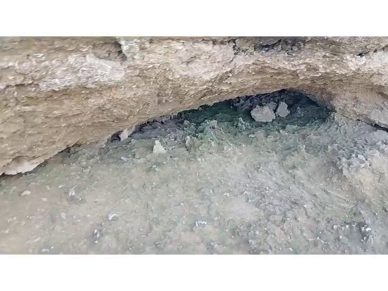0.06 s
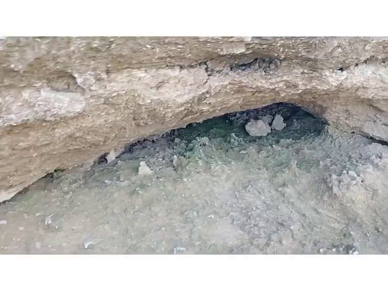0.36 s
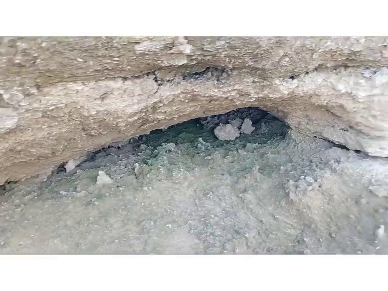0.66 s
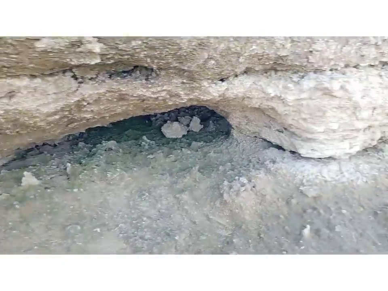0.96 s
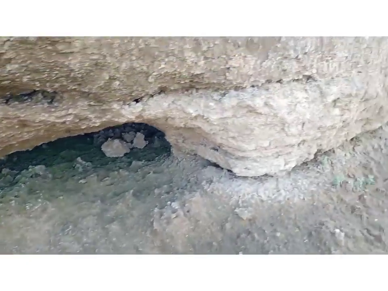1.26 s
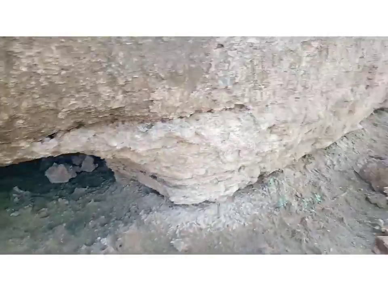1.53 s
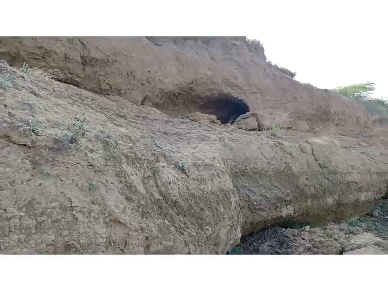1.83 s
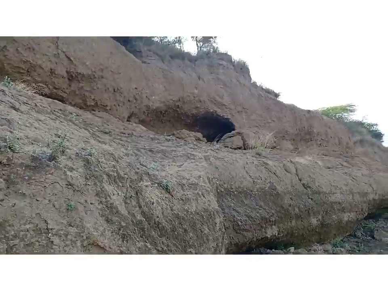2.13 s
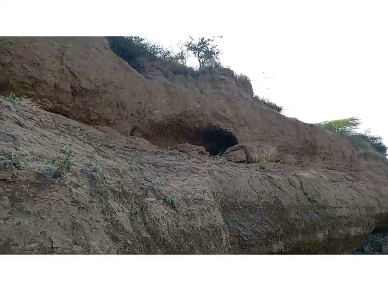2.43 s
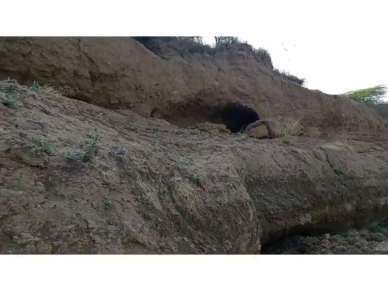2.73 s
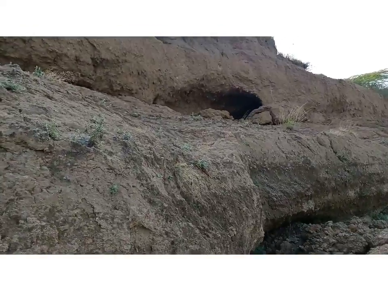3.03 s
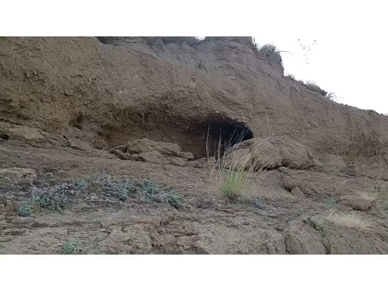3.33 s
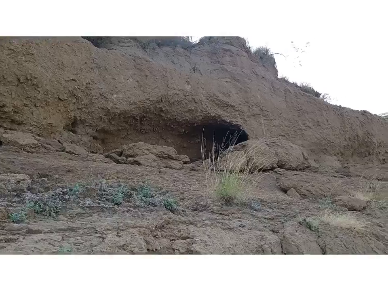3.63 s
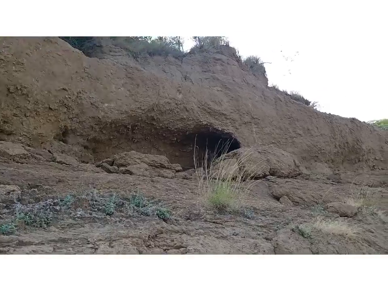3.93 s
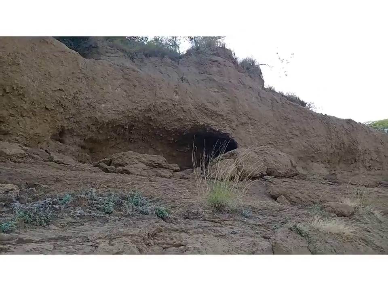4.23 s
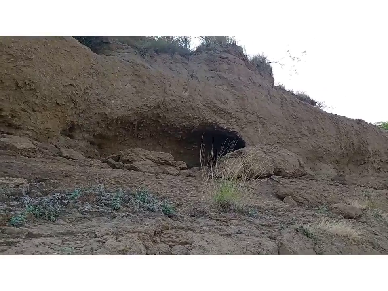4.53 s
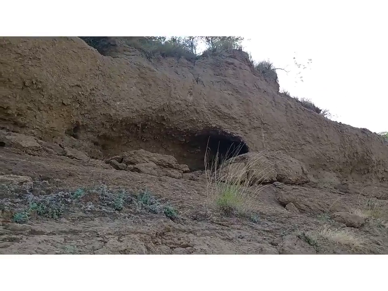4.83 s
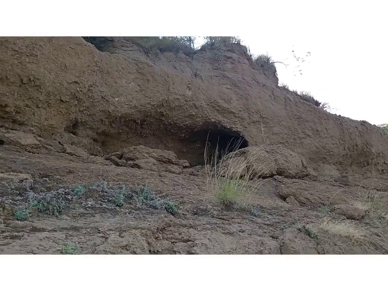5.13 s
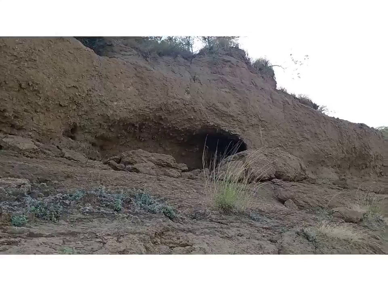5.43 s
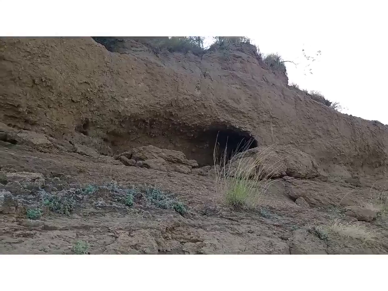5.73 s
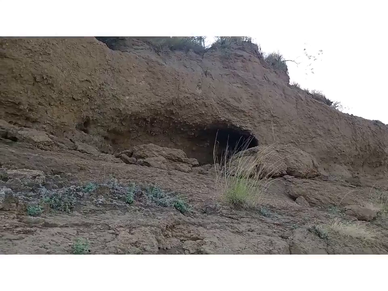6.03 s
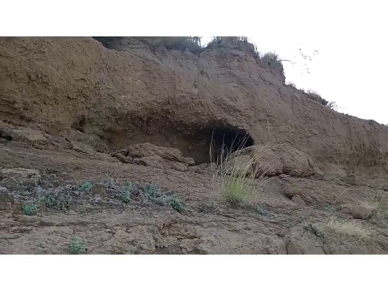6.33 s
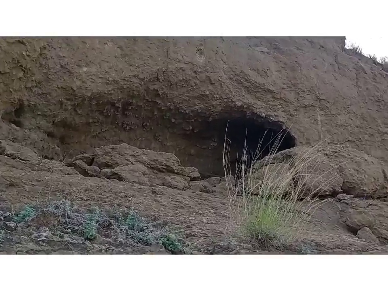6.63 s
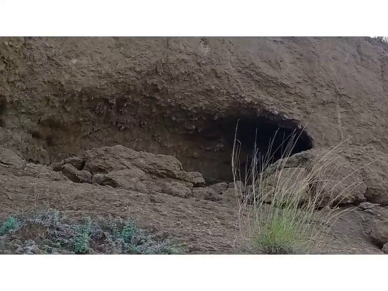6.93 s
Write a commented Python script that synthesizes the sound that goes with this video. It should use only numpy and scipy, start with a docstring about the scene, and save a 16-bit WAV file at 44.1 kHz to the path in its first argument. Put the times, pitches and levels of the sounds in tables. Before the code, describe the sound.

Outdoors, faint wind and far water hiss steadily behind close footwork. For the first 1.5 seconds, soles drag, rasp and crunch on dry, crumbly earth, building to a knock and low thump at about 1.4 seconds. The background changes tone at 1.6 seconds, and a faint, hollow drone wavers in the distance until about 3 seconds. Loose stones and a hand on the microphone make scattered damped knocks and taps, the clearest near 2.7 seconds. The sound drops out for an instant at 3.3 seconds and returns with a short crunch and a slightly quieter background. From 3.9 to 5.4 seconds come handling rumble, dull thumps, knocks and gritty steps with small cracking crumbs. A sharp, loud knock and a crunch land near 5.8 seconds, then a soft hollow bump. Dry grass rustles very faintly from about 6.2 seconds to the end at 7.

```python
"""Soles crunch, drag and rasp on dry, crumbly earth as someone shifts footing below a clay bank,
then stands in the open. Grit fractures under load and the soles stick and slip; loose stones and
the hand on the microphone's case give damped knocks, taps and thumps. Faint wind and far water
hiss behind, coloured differently at three standpoints, with a distant drone and a late rustle
of grass. The sound breaks off for an instant before the last standpoint."""
import sys
import numpy as np
from scipy import signal
from scipy.fft import rfft, irfft, next_fast_len
from scipy.io import wavfile
from scipy.ndimage import uniform_filter1d

SR = 44100
rng = np.random.default_rng(int(sys.argv[2]) if len(sys.argv) > 2 else 0)


def wav_out(sig):
    """Save sig, one row per channel (or a flat mono array), as 16-bit PCM at SR to the path in sys.argv[1]."""
    wavfile.write(sys.argv[1], SR, np.round(np.clip(np.atleast_2d(sig).T, -1, 1) * 32767).astype(np.int16))


N = 311787
TIME = np.arange(N) / SR
SLOPE_S, BREAK_S, OPEN_S = 1.62, 3.27, 3.334  # second standpoint, dropout, third standpoint
SNAP_HZ, SNAP_WIDTH_HZ = 5970, 1400  # bright mode of a hard contact
TICK_HZ, TICK_WIDTH_HZ = 10120, 1800  # resonance of the microphone port

# Sharp impacts: start_s, level_db, pitch_ratio, hardness_db_per_octave,
# place_db (+ favours the odd modes), case_ring_db, hollow_hz, treble_edge_hz, snap_db
KNOCKS = [(0.0519, -35.5, 0.82, 5.5, 2, -54, 500, 6400, -65),
          (1.4077, -13.5, 1.12, 0.5, -1.5, -40.0, 1190, 3670, -47.0),
          (1.412, -20, 0.66, 1.6, -5, -40.0, 1380, 6200, -25.5),
          (1.54, -18, 0.74, -0.8, -4.5, -33, 473, 6000, -65.0),
          (1.5623, -41.5, 0.75, 0.6, -20, -28.5, 600.0, 6200.0, -36),
          (1.6166, -30.5, 1.25, 2.5, 6, -49, 3060, 6170, -33),
          (2.1708, -34.5, 1.82, 8, 9, -54, 2460, 7500.0, -28.5),
          (2.175, -32.5, 1.22, 0.8, 3.5, -54.0, 470.0, 6200.0, -39),
          (2.644, -43.5, 1.03, -2.5, 22.5, -32, 1300, 7540, -44),
          (2.6923, -12, 0.74, -2.5, 0, -53, 1390, 7540, -38.5),
          (3.1615, -20, 0.85, 5.5, 9, -30, 910, 6160, -35.5),
          (3.3538, -30.5, 1.32, 7, 7.5, -48, 2790.0, 6200.0, -28.5),
          (4.029, -15, 0.93, 1.9, 0.3, -28, 1000, 5200.0, -30.5),
          (4.0632, -34.5, 0.62, 5, -2, -26.5, 1340.0, 6200.0, -31),
          (4.22, -38, 1.3, 2, 10.5, -21, 1220, 6040, -75),
          (4.387, -33, 0.86, 2, -21.5, -44, 445, 5900, -31),
          (4.3906, -25, 0.9, 3.5, -3.5, -29, 980.0, 7500.0, -26.5),
          (4.4545, -29, 0.59, 3, -2, -53, 1920.0, 5200.0, -40),
          (4.5476, -45.5, 1.3, -0.6, -21, -35, 690, 5900, -37.5),
          (4.8421, -14.5, 0.42, -3.5, -6.5, -33, 3320, 6050, -40),
          (5.1595, -43, 0.86, 0.9, 22, -34, 930, 7540, -63.0),
          (5.3414, -31.5, 0.75, 0.2, 16, -24.5, 1350, 7500.0, -59),
          (5.7534, -8, 1.25, 4, 3, -27, 2540, 4250, -29.5),
          (6.1503, -35.5, 0.66, -6.5, -12.5, -23.5, 576, 6000, -63)]
# Spectrum of hard sand: frequency_hz, level_db
SAND = [(2200, -2), (4000, 4.5), (5700, 3), (7000, -24), (8500, -27.5), (10800, -19), (16000, -37)]


def from_db(db):
    """Amplitude ratio of a level in decibels."""
    return 10 ** (np.asarray(db) / 20)


def rms_one(x):
    """Normalisation to rms 1."""
    return x / np.sqrt(np.mean(x ** 2) + 1e-20)


def add(out, start_s, sound):
    """Superposition of a short sound on out."""
    i = max(round(start_s * SR), 0)
    out[i:i + len(sound)] += sound[:N - i]


def level_curve(rows):
    """Envelope interpolated through (time_s, level_db) rows; silent after the last."""
    times, db = np.transpose(rows)
    return from_db(np.interp(TIME, times, db)) * (TIME <= times[-1])


def gestures(rows, attack_s, release_s):
    """Envelope of (start_s, length_s, level_db) movements; incoherent sources add in power."""
    power = 0
    for start_s, length_s, db in rows:
        rise = np.clip((TIME - start_s) / attack_s + .5, 0, 1)
        decay = np.exp(-np.maximum(TIME - start_s - length_s, 0) / release_s)
        power = power + (from_db(db) * rise * decay) ** 2
    return np.sqrt(power)


def press(centre_s, half_s):
    """Gaussian swell of pressure under a sole."""
    return np.exp(-np.minimum(((TIME - centre_s) / half_s) ** 2, 60))


def drift(rate_hz):
    """Random modulation, interpolated between rate_hz values a second; rms 1."""
    knots = rng.standard_normal(4096)
    return rms_one(np.interp(TIME * rate_hz, np.arange(len(knots)), knots))


def grains(per_s, spread_db, clump_db):
    """Shot noise of fracture: impulses at random times, their sizes swelling in clumps."""
    sizes = from_db(spread_db * np.minimum(rng.exponential(1, N), 4)) * rng.choice([-1, 1], N)
    return sizes * (rng.random(N) < per_s / SR) * from_db(clump_db * drift(rate_hz=290))


def cut(x, hz, kind, order=2):
    """Butterworth low- or high-pass."""
    return signal.sosfilt(signal.butter(order, min(hz, .45 * SR), kind, fs=SR, output="sos"), x)


def coloured(x, spectrum):
    """Spectral shaping by (frequency_hz, level_db) points; rms 1."""
    hz, db = np.transpose(spectrum)
    size = next_fast_len(N)
    bins_hz = np.maximum(np.fft.rfftfreq(size, 1 / SR), 1)
    gain = from_db(np.interp(np.log(bins_hz), np.log(hz), db)) * np.minimum(bins_hz / hz[0], 1) ** 2
    return rms_one(irfft(rfft(x, size) * gain, size)[:N])


def bell(x, hz, width_hz, db):
    """Peaking filter: lifts or lowers one band."""
    return x + (from_db(db) - 1) * signal.lfilter(*signal.iirpeak(hz, hz / width_hz, fs=SR), x)


def resonant(x, hz, width_hz):
    """Forced response of two equal resonators in series; rms 1."""
    resonator = signal.iirpeak(hz, hz / width_hz, fs=SR)
    return rms_one(signal.lfilter(*resonator, signal.lfilter(*resonator, x + 1e-18)))


def struck(hz, width_hz, cutoff_ratio=1.98, size=1024):
    """Impulse response of a damped mode, low-passed by the finite contact time; peak 1."""
    radius = np.exp(-np.pi * width_hz / SR)
    feedback = [1, -2 * radius * np.cos(2 * np.pi * hz / SR), radius * radius]
    ring = signal.lfilter([1, 0, -1], feedback, signal.unit_impulse(size))
    ring = cut(ring, cutoff_ratio * hz, "low")
    return ring / np.abs(ring).max()


def swing(hz, t60_s, rise_cycles=0.1, size=12000):
    """Damped oscillation after a soft push: a rounded onset, then exponential decay."""
    t = np.arange(size) / SR
    rise = 1 - np.exp(-t * hz / rise_cycles)
    return -from_db(-60 * t / t60_s) * rise * np.sin(2 * np.pi * hz * t)


def air():
    """Far wind and water make broadband noise, with its own spectrum at each standpoint."""
    # Background spectra: frequency_hz, level_db
    bank_spectrum = [(35, -20), (90, 3), (165, 2), (320, -14), (760, -12), (2300, -12.5), (3100, -21.5),
                     (5000, -42), (8000, -56.5), (11000, -52), (16000, -72)]
    slope_spectrum = [(35, -21), (90, 5), (170, -1.5), (350, -5), (780, -7.5), (1150, -13.5), (2250, -10),
                      (3100, -20), (4300, -35.5), (7600, -54.5)]
    open_spectrum = [(35, -18), (70, -3.5), (140, -1.5), (210, -8.5), (350, -4.5), (640, -10), (1050, -18),
                     (1500, -22.5), (2150, -15), (3700, -33), (6400, -58.5)]
    places = [(bank_spectrum, -47, TIME < SLOPE_S),
              (slope_spectrum, -45.5, (TIME >= SLOPE_S) & (TIME < OPEN_S)),
              (open_spectrum, -48.5, TIME >= OPEN_S)]
    return sum(from_db(db) * here * coloured(rng.standard_normal(N), spectrum)
               for spectrum, db, here in places)


def drone():
    """Narrow-band noise is heard as a hollow, wavering tone in the distance."""
    # Swell of the drone: time_s, level_db
    swell = [(0, -108), (1.5, -55), (2.85, -49.5), (3.1, -73)]
    return level_curve(swell) * resonant(rng.standard_normal(N), hz=390, width_hz=36)


def grass():
    """A gust rustles dry grass: countless small contacts merge into a band of noise."""
    # Rise of the gust: time_s, level_db
    gust = [(6.2, -91), (7.1, -69)]
    return level_curve(gust) * resonant(rng.standard_normal(N), hz=3500, width_hz=1200)


def rumble(breeze_db=-49):
    """Low-frequency noise: a breeze at the bank and the shifting grip shake the microphone."""
    # Shifts of the grip: start_s, length_s, level_db
    grips = [(1.523, 0.075, -38.5), (3.867, 0.19, -46.5), (3.949, 0.26, -38), (4.417, 0.11, -46.5),
             (4.829, 0.084, -48), (5.334, 0.2, -49), (6.137, 0.074, -42.5)]
    # Spectrum of the shaking: frequency_hz, level_db
    spectrum = [(35, -29.5), (55, -7), (80, 2), (140, -2.5), (250, -10), (500, -16), (1000, -72.5)]
    shake = gestures([(0, SLOPE_S, breeze_db), *grips], attack_s=0.02, release_s=0.033)
    return shake * coloured(rng.standard_normal(N), spectrum)


def thumps(push_db=3, case_hz=79.5, case_t60_s=0.066):
    """Free vibration follows each push of weight or grip; the case rings low after each knock."""
    # Dull pushes and hollow rings: start_s, pitch_hz, level_db, t60_s
    pushes = [(0.013, 101, -28, 0.16), (0.6, 90, -22, 0.081), (1.407, 85, -11, 0.094),
              (3.923, 116, -15.5, 0.014), (3.959, 103, -10, 0.017), (4.099, 98, -12, 0.016),
              (4.205, 107, -23.5, 0.069), (4.219, 415, -31, 0.066), (4.388, 140, -13.5, 0.022),
              (5.3418, 404, -24, 0.05), (5.3415, 1010, -36, 0.0076), (6.1506, 413, -27, 0.049),
              (6.1505, 1050, -36, 0.004)]
    out = np.zeros(N)
    for start_s, hz, db, t60_s in pushes:
        add(out, start_s, from_db(db + push_db) * swing(hz, t60_s))
    for start_s, _, _, _, _, case_ring_db, *_ in KNOCKS:
        add(out, start_s, from_db(case_ring_db + push_db) * swing(case_hz, case_t60_s))
    return cut(out, 62.7, "high", order=4)


def taps(half_s=0.0015, size=1024):
    """A soft contact pushes once and lets go: a smooth pulse carries little treble."""
    # Soft contacts: centre_s, pitch_hz, level_db
    contacts = [(1.656, 340, -27), (2.58, 347, -19.5), (3.389, 310, -14.5), (4.706, 336, -13.5),
                (5.8254, 344, -14)]
    out, t = np.zeros(N), (np.arange(size) - size / 2) / SR
    window = np.exp(-(t / half_s) ** 2)
    for centre_s, hz, db in contacts:
        add(out, centre_s + t[0], from_db(db) * np.cos(2 * np.pi * hz * t) * window)
    return cut(out, 41, "high", order=1)


def port(x):
    """The frequency response of the microphone port hollows out parts of the treble."""
    # Dips in the response: centre_hz, width_hz, gain_db
    dips = [(2020, 480, -4.5), (4570, 3400, -8), (8950, 3400, -8), (13700, 2600, -6.5)]
    for hz, width_hz, db in dips:
        x = bell(x, hz, width_hz, db)
    return x


def knocks(pivot_hz=1000, edge_depth_db=17, scatter_db=-31, scatter_t60_s=0.19, size=4096):
    """Modal impact: hardness favours high modes; the striking place trades odd against even ones."""
    # Heavily damped modes: frequency_hz, width_hz, level_db
    modes = [(240, 170, -1.5), (462, 1290, 3.5), (1046, 380, 2), (3170, 1700, 7.5)]
    out, t = np.zeros(N), np.arange(size) / SR
    snap = struck(TICK_HZ, TICK_WIDTH_HZ) - struck(SNAP_HZ, SNAP_WIDTH_HZ)
    for start_s, db, pitch, hardness, place_db, _, hollow_hz, edge_hz, snap_db in KNOCKS:
        body = 0
        for k, (hz, width_hz, mode_db) in enumerate(modes):
            sign = (-1) ** k
            level_db = db + mode_db + hardness * np.log2(hz / pivot_hz) + sign * place_db
            body = body + sign * from_db(level_db) * struck(hz * pitch, width_hz)
        body = bell(body, hollow_hz, width_hz=0.72 * hollow_hz, db=-9.5)
        # the contact time cuts the treble steeply and leaves weaker lobes above the edge
        contact = signal.cheby2(4, edge_depth_db, edge_hz, fs=SR, output="sos")
        add(out, start_s, signal.sosfilt(contact, body) + from_db(snap_db) * snap)
    # a faint scatter comes back from the ground
    scatter = rng.standard_normal(size) * from_db(-60 * t / scatter_t60_s)
    scatter *= from_db(scatter_db) / np.linalg.norm(scatter)
    return cut(out + signal.fftconvolve(out, scatter)[:N], 83, "high")


def crumbs(hz=3100, width_hz=1700, tick_db=-9, scatter_octaves=0.14):
    """Brittle fracture: each crumb snaps at a pitch of its own and excites the microphone port."""
    # Single fractures: start_s, level_db
    fractures = [(.812, -37), (1.5915, -25.5), (2.22, -43), (2.8573, -49), (4.4405, -47), (4.4766, -38),
                 (4.486, -26.5), (4.504, -44), (4.535, -33), (4.5828, -34.5), (4.5872, -31), (4.725, -38.5),
                 (5.765, -32)]
    out = np.zeros(N)
    tick = from_db(tick_db) * struck(TICK_HZ, TICK_WIDTH_HZ)
    detunes = scatter_octaves * rng.uniform(-1, 1, len(fractures))
    for (start_s, db), octaves in zip(fractures, detunes):
        add(out, start_s, from_db(db) * (struck(hz * 2 ** octaves, width_hz) + tick))
    return out


def trickle():
    """Sparse shot noise: fine sand ticks faintly under the scuffing soles and trickles on briefly."""
    # Runs of fine sand: start_s, length_s, level_db
    runs = [(.6, 0.77, -73.5), (4.4, 0.15, -83), (4.89, 0.082, -73), (5.08, 0.052, -70),
            (5.76, 0.047, -69.5)]
    ticks = grains(per_s=700, spread_db=5.5, clump_db=3.5)
    return gestures(runs, attack_s=0.014, release_s=0.085) * coloured(ticks, SAND)


def squeaks(width_hz=1400):
    """Stick-slip of hard sand grains drives a resonance in brief, dry scratches."""
    # Scratches under a sole: centre_s, half_length_s, level_db, pitch_hz
    scratches = [(0.631, 0.0017, -51, 5270), (2.02, 0.029, -70.5, 5400), (2.532, 0.0038, -54, 5100),
                 (2.858, 0.008, -53.5, 4300), (5.58, 0.015, -69, 4740)]
    slips = grains(per_s=2300, spread_db=6.5, clump_db=5.5)
    return sum(np.sqrt(press(centre_s, half_s)) * from_db(db) * resonant(slips, hz, width_hz)
               for centre_s, half_s, db, hz in scratches)


def drags(catch_db=3.0, attack_s=0.037, release_s=0.033):
    """Sliding friction: a sole catches and lets go; dust hisses under it and sand crackles above."""
    # Strokes of a sole: start_s, length_s, dust_db, sand_db
    strokes = [(0, 0.12, -48.5, -63.5), (0.14, 0.16, -59, -69), (0.343, 0.073, -52, -60.5),
               (0.439, 0.038, -61, -53.5), (1.04, 0.077, -55, -62.5), (1.107, 0.09, -58, -59.5),
               (1.238, 0.28, -51.5, -57)]
    # Spectrum of rubbed dust: frequency_hz, level_db
    dust_spectrum = [(1000, -14), (2500, 6), (4000, -4.5), (8000, -31)]
    catch = from_db(catch_db * drift(rate_hz=70))
    dust = coloured(catch * grains(per_s=4100, spread_db=-0.5, clump_db=7.5), dust_spectrum)
    sand = coloured(catch * grains(per_s=6000, spread_db=-1.0, clump_db=3.0), SAND)
    dust_gain = gestures([(s, length, db) for s, length, db, _ in strokes], attack_s, release_s)
    sand_gain = gestures([(s, length, db) for s, length, _, db in strokes], attack_s, release_s)
    return dust_gain * dust + sand_gain * sand


def rasps(slip_s=0.0023, slips=13, jitter=0.377, rise_octaves_per_s=6.8, scatter_octaves=0.23):
    """Stick-slip of a sole on stone: each slip rings the stone and cracks grit, rising in pitch."""
    # Runs of slips: centre_s, half_length_s, grit_db, stone_hz, stone_db
    runs = [(0.054, 0.003, -30, 1430, -30), (0.513, 0.0086, -29, 1620, -40), (1.184, 0.0042, -38, 720, -31),
            (1.272, 0.0066, -26.5, 980, -25.5), (1.293, 0.01, -30.5, 990, -30),
            (1.362, 0.011, -34, 1700, -34.5)]
    # Modes of the cracking grit: frequency_hz, width_hz, level_db
    grit_modes = [(1780, 290, 0.5), (2850, 400, -2.5)]
    stone_width_hz, snap_db = 300, -24
    out = np.zeros(N)
    snap = struck(SNAP_HZ, SNAP_WIDTH_HZ, cutoff_ratio=0.43) + .1 * struck(TICK_HZ, TICK_WIDTH_HZ)
    for centre_s, half_s, grit_db, stone_hz, stone_db in runs:
        modes = [(stone_hz, stone_width_hz, stone_db)]
        modes += [(hz, width_hz, grit_db + db) for hz, width_hz, db in grit_modes]
        for k, (offset, *detunes) in enumerate(rng.uniform(-1, 1, (slips, len(modes) + 1))):
            lag_s = (k - slips // 2 + jitter * offset) * slip_s
            slip = from_db(grit_db + snap_db) * snap
            for (hz, width_hz, db), detune in zip(modes, detunes):
                pitch = 2 ** (rise_octaves_per_s * lag_s + scatter_octaves * detune)
                ring = struck(hz * pitch, width_hz, cutoff_ratio=1)
                slip = slip + rng.choice([-1, 1]) * from_db(db) * ring
            add(out, centre_s + lag_s, np.exp(-.5 * (lag_s / half_s) ** 2) * slip)
    return out


def gravel(quality_factor=9, stone_sizes=14):
    """Fractures excite the resonances of stones of many sizes, each for a few cycles; rms 1."""
    out = np.zeros(N)
    for hz in np.geomspace(700, 7000, stone_sizes):
        cracks = grains(per_s=350, spread_db=0.0, clump_db=-0.5)
        out += signal.lfilter(*signal.iirpeak(hz, quality_factor, fs=SR), cracks)
    return rms_one(out)


def crunches(judder_db=2.0):
    """Fracture under load: grit cracks brightly, earth crushes dully; power follows the sole's press."""
    # Presses of a sole: centre_s, half_length_s, grit_db, earth_db
    presses = [(0.477, 0.039, -48, -68), (1.151, 0.029, -43, -60), (1.35, 0.13, -43, -56),
               (1.462, 0.011, -39, -37), (3.37, 0.017, -45.5, -34), (4.379, 0.026, -48.5, -47.5),
               (4.493, 0.095, -57, -49.5), (4.927, 0.032, -52, -40), (5.112, 0.036, -58.5, -41),
               (5.779, 0.05, -50.5, -41)]
    # Spectra of cracking grit and crushed earth: frequency_hz, level_db
    grit_spectrum = [(400, -37), (800, -6), (1400, 1.5), (2100, 4), (2800, -2), (4000, -14.5), (6000, -28),
                     (8000, -41), (10800, -23), (14000, -49)]
    earth_spectrum = [(70, -16.5), (150, 10.5), (350, 0), (700, -2), (1050, -6.5), (1800, -10.5),
                      (5000, -81.5)]
    grit_power, earth_power = np.zeros(N), np.zeros(N)
    for centre_s, half_s, grit_db, earth_db in presses:
        load = press(centre_s, half_s)
        grit_power += load * from_db(grit_db) ** 2
        earth_power += load * from_db(earth_db) ** 2
    cracks = rms_one(grains(per_s=2500, spread_db=1.5, clump_db=6.5)) + gravel()
    judder = from_db(judder_db * drift(rate_hz=190))  # the sole catches and lets go
    grit = coloured(cracks * judder, grit_spectrum)
    earth = coloured(grains(per_s=2100, spread_db=-2.0, clump_db=1.0), earth_spectrum)
    return np.sqrt(grit_power) * grit + np.sqrt(earth_power) * earth


def scene():
    """Superposition of impacts, footwork and background at one microphone."""
    impacts = port(knocks() + crumbs()) + taps() + thumps()
    footwork = crunches() + rasps() + drags() + trickle() + squeaks()
    background = rumble() + air() + grass() + drone()
    return (impacts + footwork + background)[None]


def record(dry, break_db=-36, stopband_hz=16600):
    """Gating and band limiting: the sound drops out for an instant, and the top treble is cut."""
    in_break = (TIME > BREAK_S) & (TIME < OPEN_S)
    gate = uniform_filter1d(np.where(in_break, from_db(break_db), 1.), size=64)
    low_pass = signal.cheby2(14, 60, stopband_hz, fs=SR, output="sos")
    return signal.sosfilt(low_pass, dry * gate)


dry = scene()
out = record(dry)
wav_out(out)
```